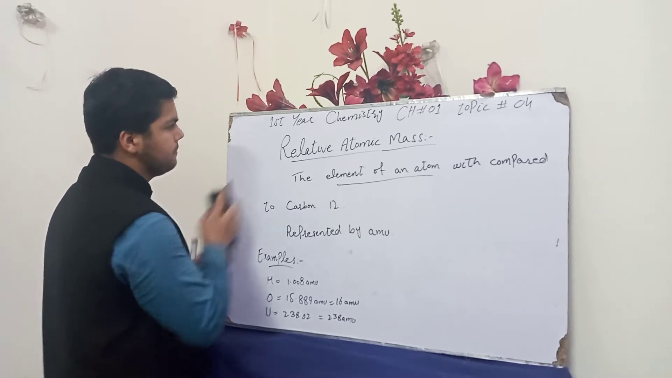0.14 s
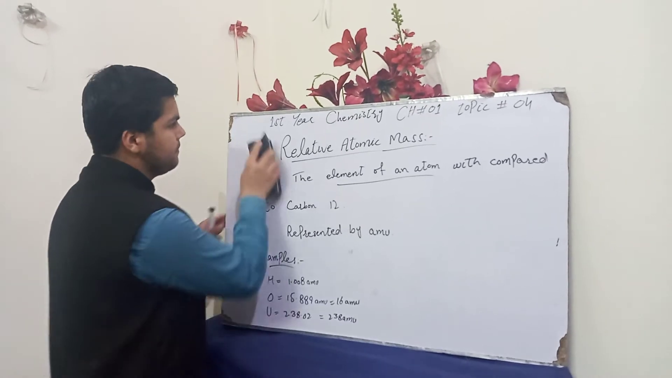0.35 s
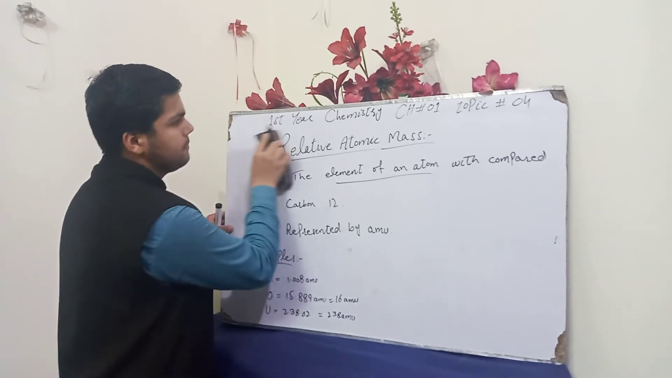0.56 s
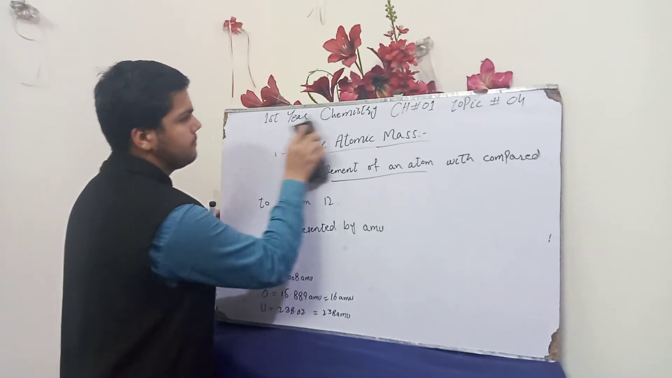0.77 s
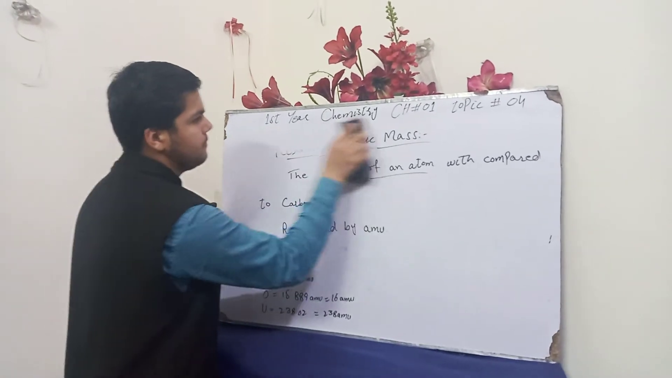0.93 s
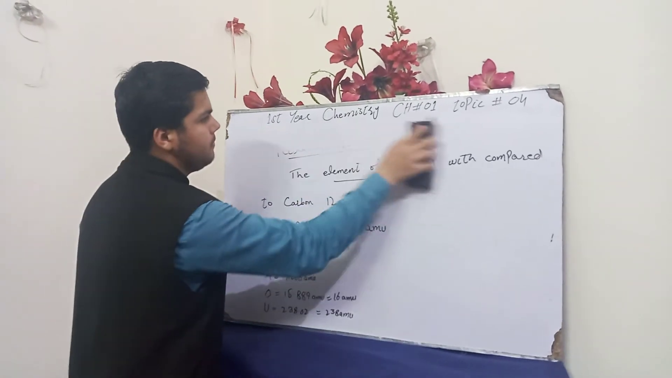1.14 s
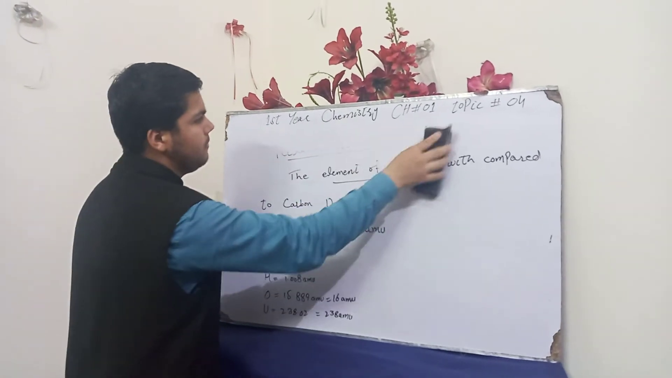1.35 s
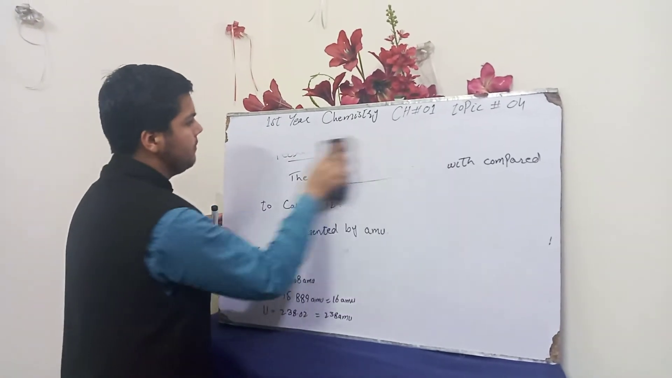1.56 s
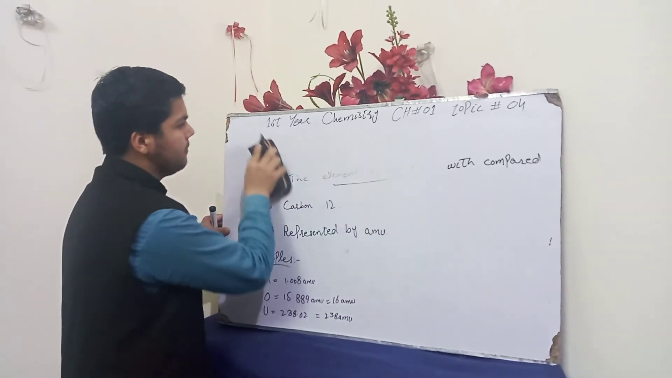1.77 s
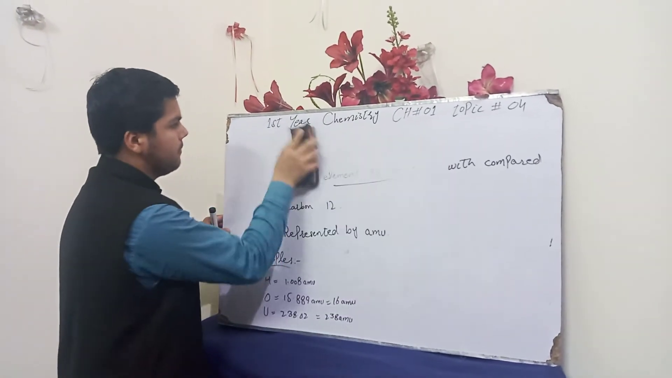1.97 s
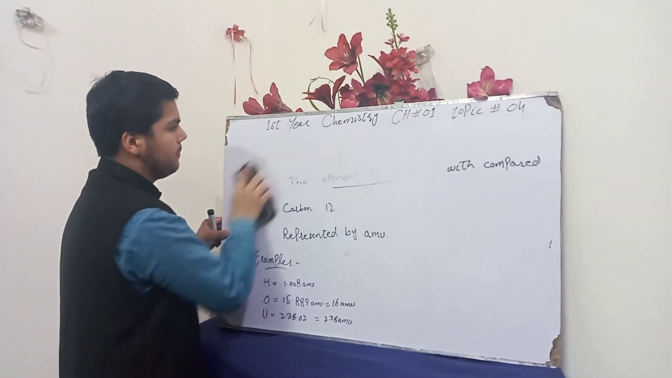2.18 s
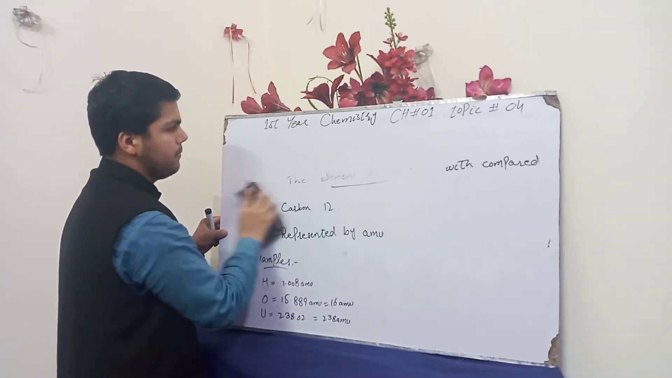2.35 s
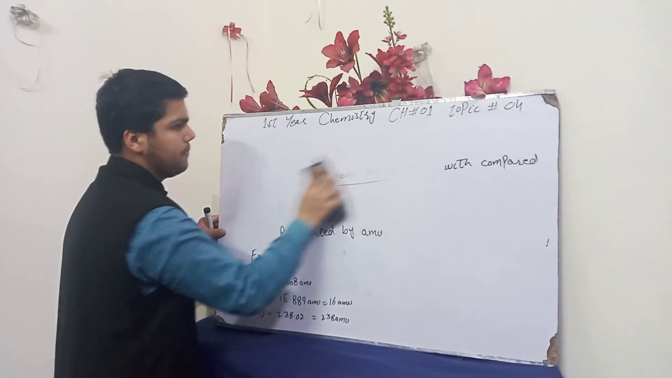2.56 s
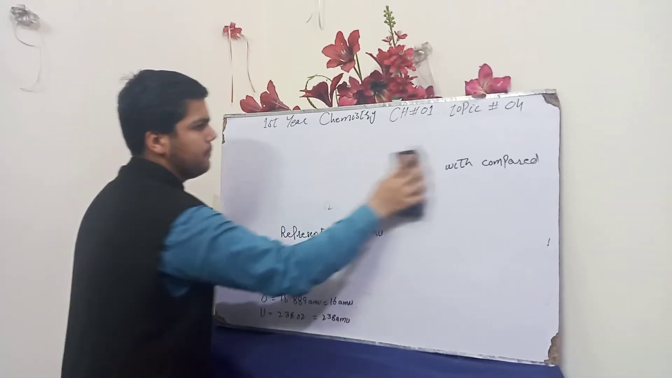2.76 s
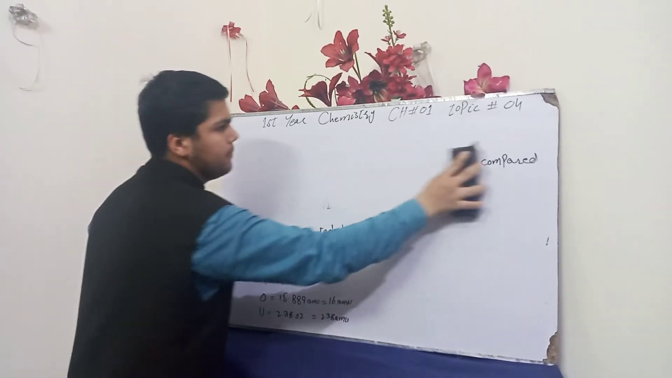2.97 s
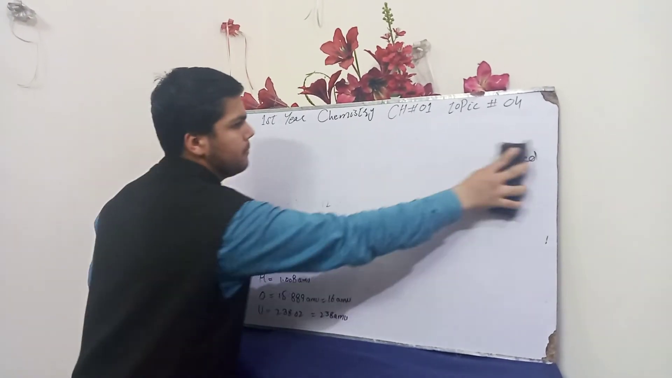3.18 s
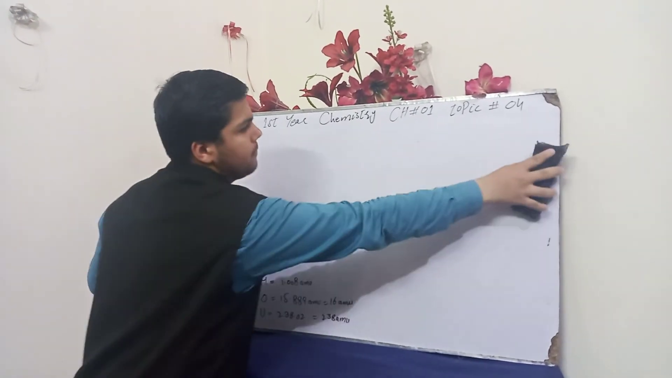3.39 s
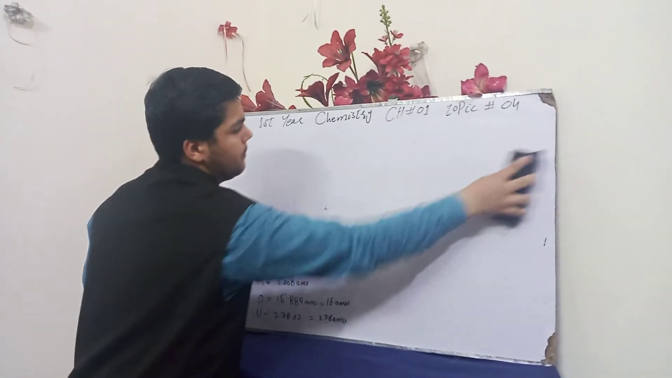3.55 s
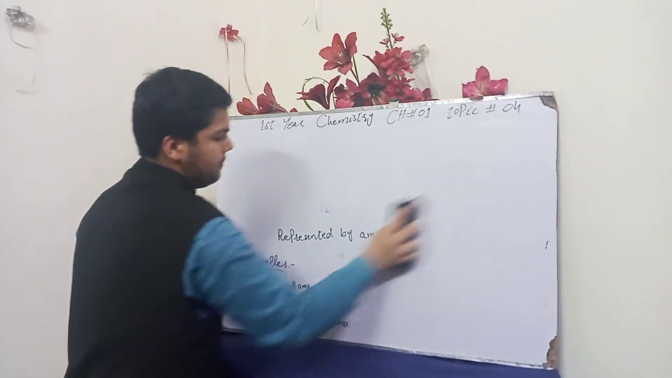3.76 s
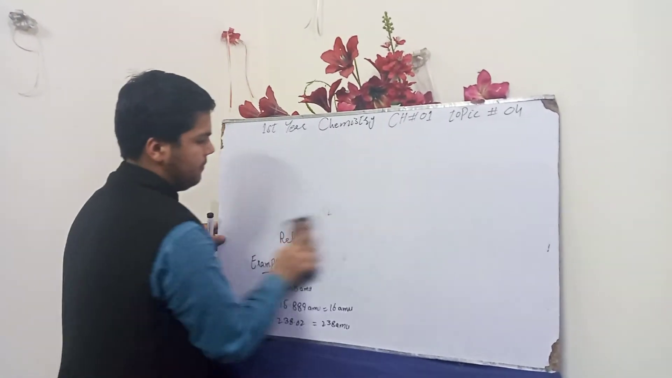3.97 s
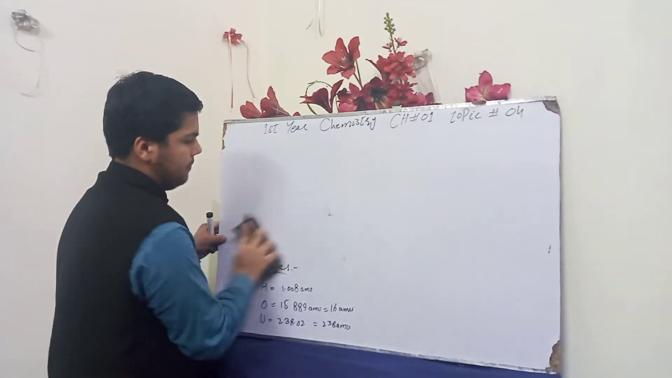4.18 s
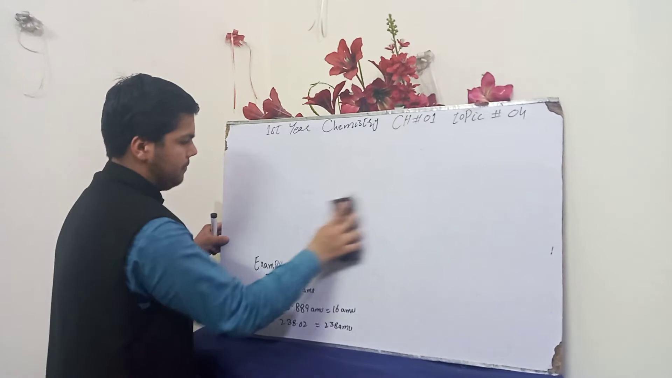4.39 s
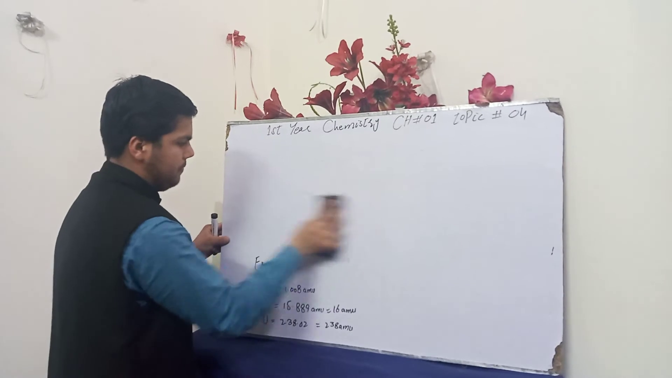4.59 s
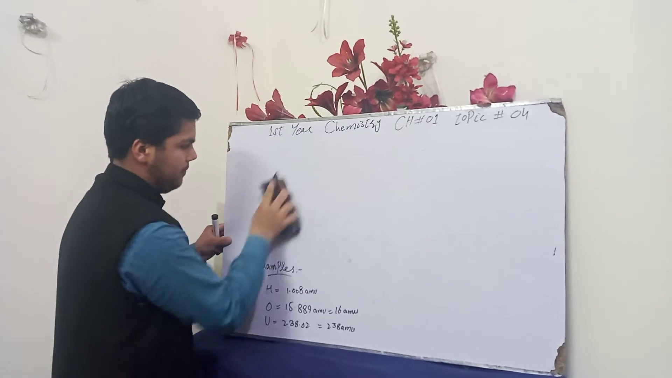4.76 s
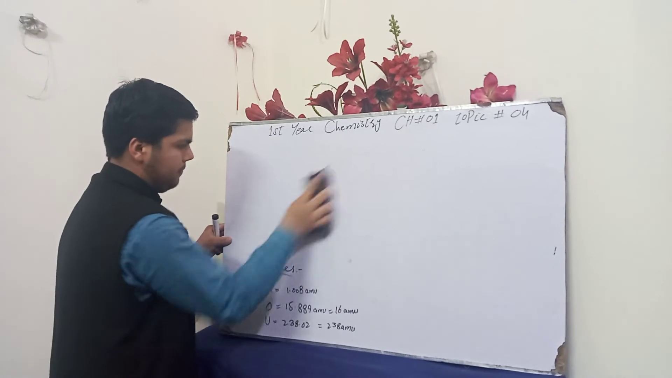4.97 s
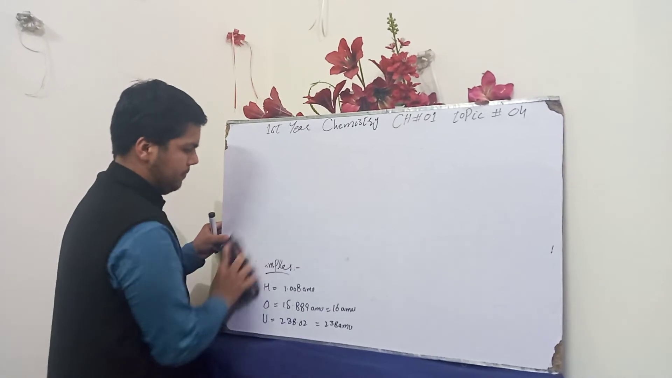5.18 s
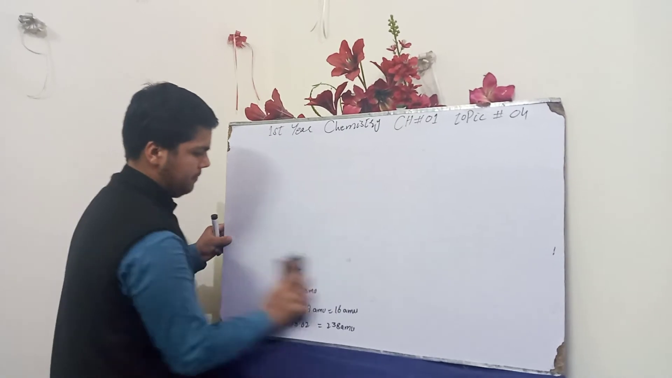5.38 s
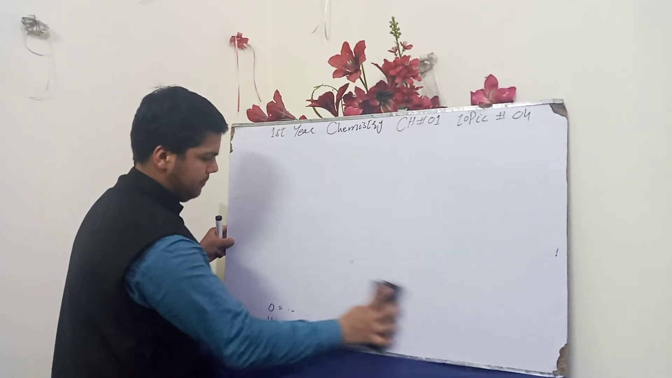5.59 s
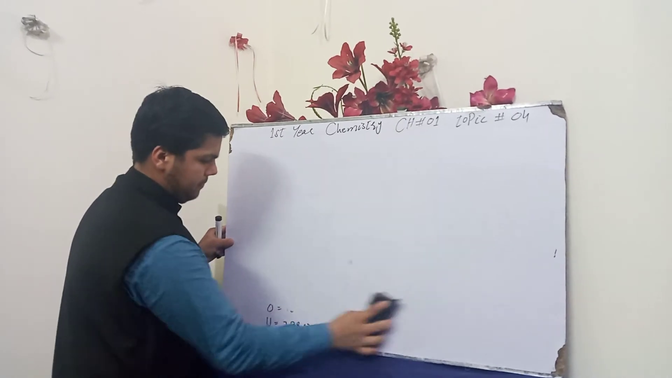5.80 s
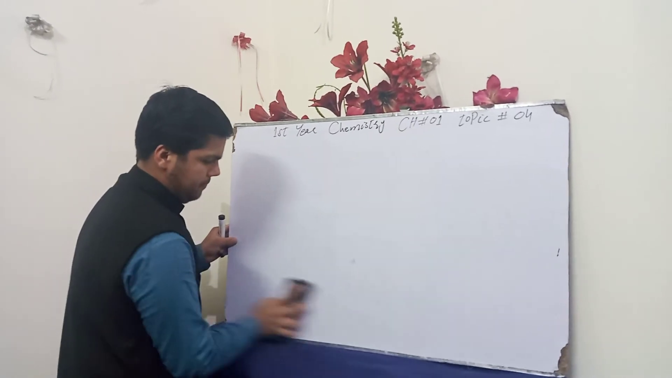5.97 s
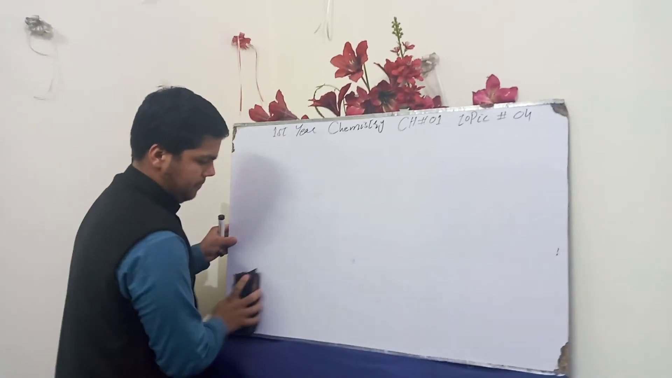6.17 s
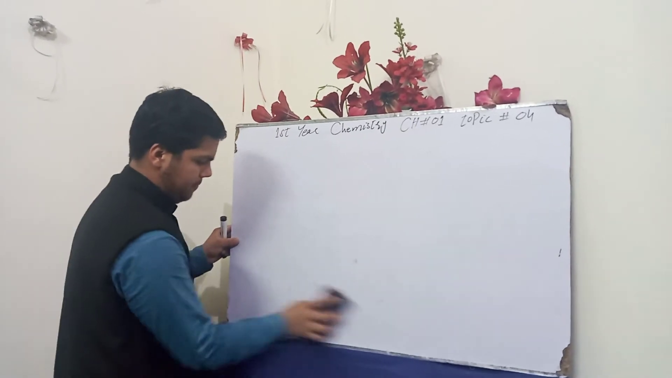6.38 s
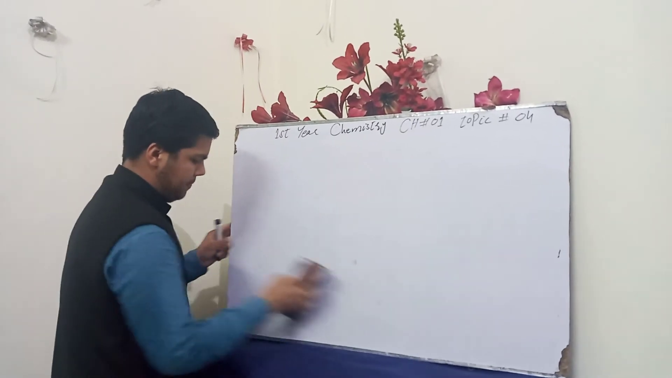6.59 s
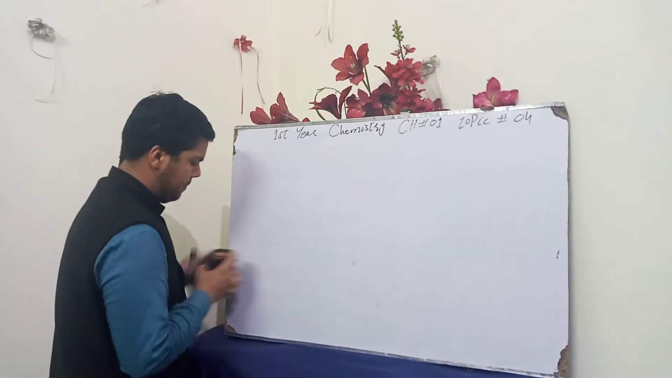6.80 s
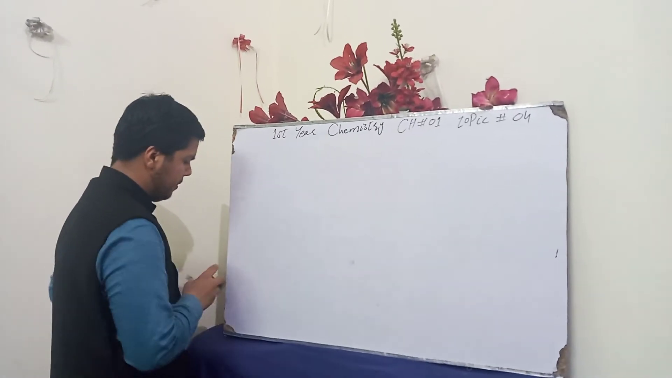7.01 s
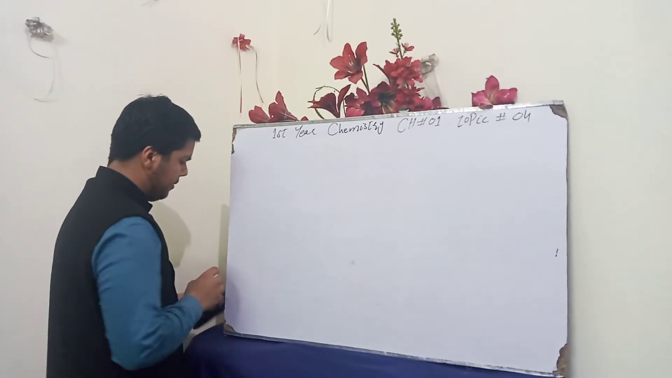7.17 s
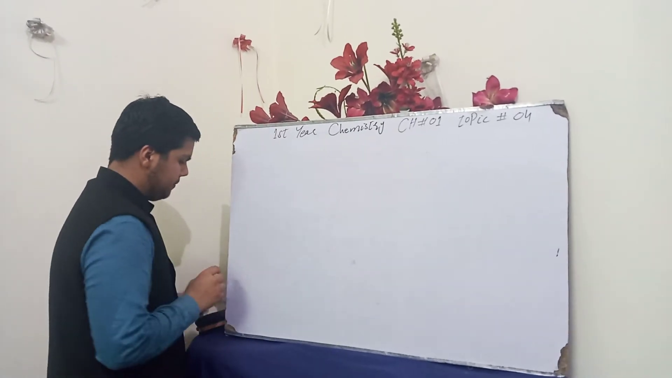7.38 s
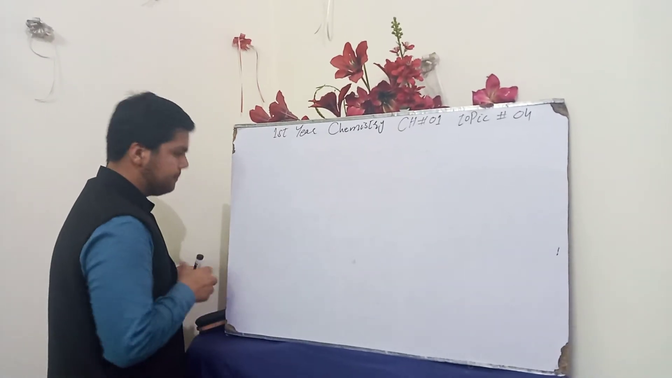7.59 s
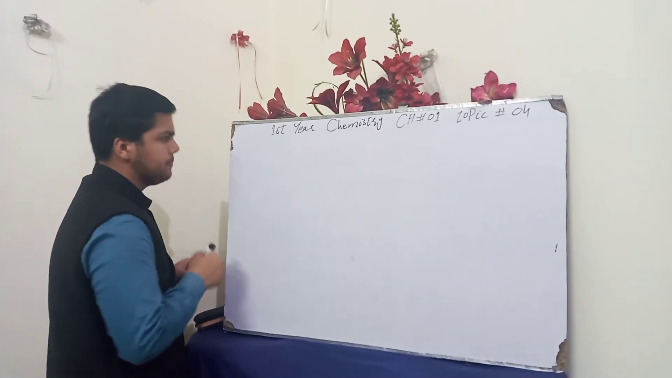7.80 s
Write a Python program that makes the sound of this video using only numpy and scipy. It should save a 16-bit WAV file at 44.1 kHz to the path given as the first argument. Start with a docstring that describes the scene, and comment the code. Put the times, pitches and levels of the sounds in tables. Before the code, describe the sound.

Steady rubbing of an eraser to and fro across a whiteboard, with small ticks, then rustling sleeves and a dull knock.

```python
"""A sleeve rustles in a small, quiet room, then a felt eraser wipes a whiteboard in long strokes to and fro.
The felt hisses with the hand's speed and rubs hollowly where it grips; the hard rim ticks at the turns.
The loose board flexes under the hand and knocks softly when the wiping is over, as the sleeves drop.
On a pair of microphones, the hiss reaches the left one about a millisecond late,
and that lag follows the eraser across the board."""
import sys
import numpy as np
from scipy import signal
from scipy.fft import rfft, irfft, next_fast_len
from scipy.io import wavfile
from scipy.ndimage import uniform_filter1d, map_coordinates

SR = 44100
rng = np.random.default_rng(int(sys.argv[2]) if len(sys.argv) > 2 else 0)


def inscribe(sig):
    """Save sig as 16-bit PCM at rate SR to the path in sys.argv[1].

    A 1-D sig is mono; a 2-D sig holds one channel per row.
    Samples are clipped to [-1, 1] before scaling.
    """
    pcm = np.round(np.clip(np.atleast_2d(sig).T, -1, 1) * 32767)
    wavfile.write(sys.argv[1], SR, pcm.astype(np.int16))


N = 345811

# sweeps of the arm, turn to turn: start_s, speed_up_s, slow_down_s, full_speed_db, first_edge_hz,
# last_edge_hz, first_tilt_db_per_octave, last_tilt_db_per_octave, direct_share
ARM_STROKES = [(0.196, 0.16, 0.076, -48, 1980.0, 1310.0, 0.5, -5.5, 0.44),
               (0.412, 0.68, 0.12, -34, 1780.0, 1750, -1.5, -3.8, 0.6),
               (1.221, 0.39, 0.17, -32.5, 1120, 840.0, -2.5, -1.5, 0.72),
               (1.728, 0.045, 0.2, -34.5, 570.0, 1620, -3.1, -2.4, 0.45),
               (1.931, 0.2, 0.081, -35.3, 1290.0, 1640.0, -2.0, -3, 0.57),
               (2.148, 0.45, 0.75, -31.5, 1670, 1740, -2.4, -7, 0.4),
               (3.378, 0.624, 0.061, -33, 1610, 1420.0, -1.2, -0.5, 0.63),
               (4.09, 0.22, 0.112, -32, 810.0, 2120, -1.8, -4.0, 0.58),
               (4.406, 0.18, 0.11, -33.5, 1130, 1590, -3, -1.2, 0.53),
               (4.671, 0.015, 0.23, -32.5, 1240, 1100, -3.5, -2.5, 0.5),
               (4.852, 0.255, 0.052, -34, 960.0, 1640.0, -1.7, -2.5, 0.55),
               (5.139, 0.31, 0.19, -29.8, 1040, 1650.0, 0.3, -8, 0.55),
               (5.576, 0.44, 0.072, -35, 1340, 1510, -3, -1.5, 0.4),
               (6.087, 0.16, 0.19, -36, 1360, 1300, 3, -6.5, 0.46),
               (6.326, 0.073, 0.26, -53, 1810, 3800, -1, -4, 0.25)]
# lag of the left microphone at first contact, then at the end of each stroke: lag_ms
TURN_LAGS_MS = [1.03, 1.02, .868, 1.03, .982, 1.042, .79, 1.04, .938, 1.022, .965, 1.05, .918, 1.04, .96,
                1.07]


def amp(db):
    """Decibels to gain."""
    return 10 ** (np.asarray(db) / 20)


def unit(x):
    """x at rms 1."""
    return x / np.sqrt(np.mean(x ** 2) + 1e-20)


def along(points, hz):
    """(Hz, value) points read on a log axis."""
    f, v = np.transpose(points)
    return np.interp(np.log(hz + 1), np.log(f), v)


def wobble(rate):
    """A smooth random curve, rate knots a second."""
    return map_coordinates(rng.standard_normal(int(N * rate / SR) + 4), [np.arange(N) * rate / SR])


def filtered(x, response):
    """x times a response of frequency."""
    size = next_fast_len(N + 8192)
    return irfft(rfft(x, size) * response(np.fft.rfftfreq(size, 1 / SR)), size)[..., :N]


def coloured(x, spectrum):
    """x shaped by a spectrum, at rms 1."""
    return unit(filtered(x, lambda hz: amp(along(spectrum, hz))))


def add(track, s, sound):
    """Mix a sound into a track at time s."""
    part = track[..., round(s * SR):][..., :sound.shape[-1]]
    part += sound[..., :part.shape[-1]]


def hand_speeds(t):
    """One row per stroke: the hand eases up to full speed (1) and down to rest again."""
    start, rise, fall = np.transpose(ARM_STROKES)[:3, :, None]
    ramp = np.minimum((t - start) / rise, (start + rise + fall - t) / fall)
    return np.sin(np.pi / 2 * np.clip(ramp, 0, 1))


def lag_ms(t):
    """The left microphone's lag follows the eraser's place on the board."""
    travelled = hand_speeds(t).cumsum(axis=1)
    return TURN_LAGS_MS[0] + np.diff(TURN_LAGS_MS) @ (travelled / travelled[:, -1:])


def mic_pair(x):
    """The direct sound at both microphones, the left one late."""
    n = np.arange(N)
    coarse = n[::64]
    late = n - np.interp(n, coarse, lag_ms(coarse / SR)) * SR / 1000
    return np.array([map_coordinates(x, [late], order=5), x])


def stereo_noise(direct):
    """White noise: a direct share common to both microphones, the rest scattered by the walls."""
    share = np.clip(direct, 0, 1)
    common = mic_pair(rng.standard_normal(N))
    return np.sqrt(share) * common + np.sqrt(1 - share) * rng.standard_normal((2, N))


def in_room(x, wet_db, t60):
    """The direct sound and the short answer of the walls."""
    t = np.arange(SR // 2) / SR
    tail = rng.standard_normal((2, len(t))) * amp(-60 * t / t60) * (t > .003)
    tail /= np.linalg.norm(tail[0])
    return mic_pair(x) + amp(wet_db) * signal.fftconvolve(x[None], tail, axes=1)[:, :N]


def patches(shape, depth_db, bins, frames):
    """Random gain over frequency and time: nearby reflections shift as the hand moves."""
    field = rng.standard_normal(shape)
    for _ in range(2):
        field = uniform_filter1d(uniform_filter1d(field, bins, axis=-2), frames, axis=-1)
    return amp(depth_db * unit(field))


def room_tone(rumble_db=-67, air_db=-69, swell_db=1.7):
    """A low rumble that wells up unevenly, and a thin hiss."""
    # the room's low end: frequency_hz, level_db
    rumble_spectrum = [(20, -15), (45, -20), (75, -6.5), (130, -2), (210, -6.5), (300, -11.5), (450, -15),
                       (700, -19), (1500, -34), (4000, -70)]
    # the room's hiss: frequency_hz, level_db
    air_spectrum = [(300, -2.5), (800, 0.5), (990, 8), (1150, 5), (5000, 1), (7200, 6), (8200, -4),
                    (9500, -1), (12000, -13), (13800, -16), (14700, -6), (15700, -7)]
    z = signal.stft(stereo_noise(direct=0.56), SR, nperseg=2048)[2]
    lumps = patches(z.shape[1:], depth_db=3.5, bins=2, frames=3)
    rumble = coloured(signal.istft(z * lumps, SR, nperseg=2048)[1][:, :N], rumble_spectrum)
    rumble *= amp(rumble_db + swell_db * wobble(rate=9))
    return rumble + amp(air_db) * coloured(stereo_noise(direct=0.092), air_spectrum)


def sleeves(gain_db=2, crinkle_db=2.3, crisp_hz=7800):
    """Cloth and hand brush along as the arm comes up and drops again; each brush swells and fades."""
    # brushes of the sleeve: peak_s, level_db, swell_s, t60_s, extra_treble_db
    sleeve_brushes = [(0, -58, .017, 2, 0), (.125, -55, .02, .4, 0), (6.465, -57, .017, .6, 0),
                      (6.5, -56, .02, 1, -2), (6.64, -55.5, .012, .4, 2), (6.67, -56, .01, .5, -1),
                      (6.755, -52.5, .015, .5, -1), (6.861, -44.5, .016, .22, 2),
                      (6.897, -49.5, .012, .25, -2), (6.97, -58.5, .05, 1.3, -4), (7.082, -64, .02, .6, -3),
                      (7.175, -65, .03, .6, 0), (7.242, -55, .02, .5, 3.5), (7.292, -57, .02, .25, 2),
                      (7.575, -68, .05, .4, 5), (7.688, -62.5, .018, .25, 2)]
    # rustling cloth: frequency_hz, level_db
    cloth_spectrum = [(200, -21), (700, -36), (1400, -12), (2800, -6), (3700, -2), (7000, 0.5),
                      (8200, -8.5), (9500, -8), (11000, -19.5), (13500, -25), (14700, -9), (15700, -29)]
    t = np.arange(N) / SR
    power = np.array([amp(db - 60 * np.maximum(t - s, 0) / t60) ** 2
                      * np.exp(-2 * (np.minimum(t - s, 0) / swell) ** 2)
                      for s, db, swell, t60, _ in sleeve_brushes])
    crispness = amp([row[-1] for row in sleeve_brushes]) ** 2
    z = signal.stft(stereo_noise(direct=0.25), SR, nperseg=512)[2]
    folds = patches(z.shape, depth_db=2.4, bins=2, frames=8)
    rustle = signal.istft(z * folds, SR, nperseg=512)[1][:, :N]
    cloth = coloured(rustle * amp(crinkle_db * wobble(rate=79)), cloth_spectrum)
    top = filtered(cloth, lambda hz: hz > crisp_hz)
    return amp(gain_db) * (np.sqrt(power.sum(0)) * (cloth - top) + np.sqrt(crispness @ power) * top)


def rubbing(t, speed_power=0.6, turn_dull_db=1, turn_diffuse=.2, linger_db=-4.8, linger_t60=0.5):
    """Hand speed and the felt's bites set the hiss's level, low edge, treble tilt and direct share."""
    # the felt bites as the hand bears down, mostly just after a turn:
    # time_s, louder_db, half_length_s, edge_drop_octaves, brighter_db_per_octave
    felt_bites = [(1.311, 2.5, 0.027, 0.0, 0), (1.785, 4.5, 0.015, 0.28, 0.5),
                  (1.975, 5.5, 0.028, 0.21, 0.4), (2.276, 1.3, 0.056, 0.96, 2.5),
                  (3.232, 3.5, 0.14, 0.0, 3.5), (3.574, 0.3, 0.069, 0.38, -0.5),
                  (4.114, 10.5, 0.042, 0.069, 0.5), (4.457, 7, 0.02, 0.012, 4.5),
                  (4.704, 3.5, 0.022, 0.1, -0.2), (4.909, 5.5, 0.03, 0.08, 1.5),
                  (5.44, 2, 0.067, 0.0019, -0.2), (5.915, 2, 0.038, 0.6, 0.5)]
    strokes = np.transpose(ARM_STROKES)[:, :, None]
    start, rise, fall, full_db, first_hz, last_hz, first_tilt, last_tilt, direct = strokes
    speed = hand_speeds(t)
    progress = np.clip((t - start) / (rise + fall), 0, 1)
    power = (amp(full_db) * speed ** speed_power) ** 2 + 1e-14
    # the hiss lingers in the room and fills the turns
    kept = amp(-60 * (t[1] - t[0]) / linger_t60) ** 2
    power = power + amp(linger_db) ** 2 * signal.lfilter([1 - kept], [1, -kept], power)
    share = power / power.sum(0)  # strokes overlap where a turn is rounded
    edge_hz = (share * (first_hz + (last_hz - first_hz) * progress)).sum(0)
    # a slowing hand loses treble and direct sound, leaving the room
    stroke_tilt = first_tilt + (last_tilt - first_tilt) * progress - turn_dull_db * (1 - speed) ** 2
    tilt = (share * stroke_tilt).sum(0)
    direct = (share * direct * speed ** turn_diffuse).sum(0)
    s, louder_db, length, octaves, brighter = np.transpose(felt_bites)
    bite = np.exp(-((t - s[:, None]) / length[:, None]) ** 2)
    level_db = 10 * np.log10(power.sum(0)) + louder_db @ bite
    return level_db, edge_hz / 2 ** (octaves @ bite), tilt + brighter @ bite, direct


def swish(hz, t, depth_db=1.9, count=10, echo_ms=(0.497, 6), slide_spread=1.83):
    """Each nearby reflection combs the hiss, and the combs sweep as the eraser travels."""
    moved_ms = lag_ms(t) - TURN_LAGS_MS[0]
    delays = rng.uniform(*echo_ms, (count, 2, 1, 1))
    slides = rng.normal(0, slide_spread, (count, 2, 1, 1))
    combs = sum(np.cos(2 * np.pi * hz * (ms + slide * moved_ms) / 1000)
                for ms, slide in zip(delays, slides))
    return amp(depth_db * unit(combs))


def eraser_hiss(grain_db=1.0, judder_db=0.58, knee_hz=4000, steepness=5.1, hump_db=3, hump_octaves=0.077):
    """Countless felt fibres slip at once; speed brightens them, pressure lets the board sound lower."""
    # the felt's hiss as heard, with the microphones' bright peaks near 6.6 and 15 kHz:
    # frequency_hz, level_db
    hiss_spectrum = [(100.0, -30.0), (600.0, -25.5), (920.0, -16.5), (1300.0, -14.5), (2100.0, -9),
                     (2500.0, -8), (3300.0, -6.5), (5000.0, -6.6), (6600.0, -1), (8100.0, -11),
                     (9500.0, -11.5), (13850.0, -21), (14650.0, -11.5), (15700.0, -7.5)]
    # the board's rings under the felt and the hollows between: centre_hz, width_hz, gain_db
    board_rings = [(848, 78, 7.5), (930, 26, 7), (1002.3, 37, 13), (1664, 40, 2), (2084, 300, 2.2),
                   (2750, 390, -1), (3290, 260, 2.5), (3750, 260, 0.15), (4190, 350, 2)]
    coarse = np.arange(0, N, 64)
    level_db, _, _, direct = [np.interp(np.arange(N), coarse, curve) for curve in rubbing(coarse / SR)]
    hz, t, z = signal.stft(unit(stereo_noise(direct)), SR, nperseg=1024)
    hz = hz[:, None] + 1
    _, edge_hz, tilt_db, _ = rubbing(t)
    colour = unit(amp(along(hiss_spectrum, hz)))
    board = amp(sum(db / (1 + (2 * (hz - centre) / width) ** 2) for centre, width, db in board_rings))
    # the pad radiates only above a steep, resonant edge, which drops as it bears down
    hump = amp(hump_db * np.exp(-(np.log2(hz / edge_hz) / hump_octaves) ** 2))
    contact = hump / np.sqrt(1 + (edge_hz / hz) ** (2 * steepness))
    treble = amp(tilt_db * np.log2(np.maximum(hz / knee_hz, 1)))
    reflections = patches(z.shape, depth_db=1.15, bins=3, frames=13) * swish(hz, t)
    hiss = signal.istft(z * colour * board * contact * treble * reflections, SR, nperseg=1024)[1][:, :N]
    grip = unit(amp(grain_db * wobble(rate=900) + judder_db * wobble(rate=42)))
    return hiss * grip * amp(level_db)


def board_flexes(fade_s=.016):
    """The board gives soft low thuds that swell for a few cycles and stop short."""
    # soft thuds as the board gives: peak_s, level_db, pitch_hz, swell_s
    heaves = [(.382, -48.5, 94, .016), (.734, -55, 132, .02), (1.756, -45, 146, .03),
              (3.186, -60, 135, .02), (3.979, -58, 123, .02), (4.43, -55, 128, .015),
              (7.165, -50.5, 135, .02), (7.23, -49, 70, .014), (7.543, -56, 119, .025),
              (7.712, -55, 137, .025)]
    track, t = np.zeros(N), np.arange(SR // 5) / SR - .1
    for s, db, hz, swell_s in heaves:
        heave = np.exp(-(t / np.where(t < 0, swell_s, fade_s)) ** 2)
        add(track, s + t[0], amp(db) * heave * np.sin(2 * np.pi * (hz * t + rng.random())))
    return mic_pair(track)


def eraser_drags(half_width_hz=110):
    """Eraser and board resonate briefly while the felt grips."""
    # the eraser lands, presses, turns or lifts: peak_s, level_db, half_length_s, resonance_hz
    hollow_rubs = [(0.421, -70.5, 0.12, 1023), (1.812, -66, 0.045, 487), (2.283, -66, 0.031, 500),
                   (2.375, -63, .03, 1010), (2.44, -50.5, 0.079, 2080), (2.62, -66, .1, 1050),
                   (3.08, -50, 0.13, 1840), (3.581, -62, 0.07, 1000), (4.156, -60.5, 0.05, 490),
                   (2.6, -47, 0.078, 3380), (4.3, -45.5, 0.068, 3330), (4.62, -51, 0.034, 2050),
                   (4.727, -66, 0.055, 487), (4.903, -77, 0.068, 476), (5.1, -51, 0.033, 1970),
                   (5.39, -48, 0.054, 3190), (5.43, -44.5, 0.065, 4260), (5.49, -45.5, 0.046, 2000),
                   (5.7, -69, 0.028, 1070), (5.931, -67, 0.057, 505), (6.22, -62.5, 0.046, 1100),
                   (6.778, -66, 0.044, 504), (6.892, -67, 0.025, 1850), (6.998, -68, 0.037, 1490)]
    track, t = np.zeros(N), np.arange(SR // 2) / SR - .25
    hz = np.fft.rfftfreq(len(t), 1 / SR)
    for s, db, length, body_hz in hollow_rubs:
        band = 1 / (1 + ((hz - body_hz) / half_width_hz) ** 4)
        body = unit(irfft(rfft(rng.standard_normal(len(t))) * band, len(t)))
        add(track, s + t[0], amp(db) * np.exp(-(t / length) ** 2) * body)
    return in_room(track, wet_db=-2.0, t60=0.12)


def dry_ticks(t60=.003):
    """The eraser's hard rim catches on the board with dry little cracks; later, it scuffs at the board's edge
    with a few ticks, and the eraser is set down with a click."""
    # dry little cracks: start_s, peak_db, low_hz, high_hz; the rim catches up to 6.2 s, then the eraser scuffs
    # at the board's edge, and it is set down at 7.23 s
    dry_cracks = [(1.3012, -17, 2000, 7000), (1.3074, -25, 2000, 8000), (1.3184, -22, 2000, 7000),
                  (4.1074, -22, 2000, 8000), (4.1204, -21, 2000, 8000), (4.1334, -20, 2000, 7000),
                  (4.2075, -24, 2000, 7000), (4.6778, -21, 2000, 8000), (4.6974, -18, 2000, 8000),
                  (5.2151, -24, 2000, 8000), (5.2595, -17, 2000, 7500), (6.137, -23, 3500, 9000),
                  (6.6344, -43, 4000, 10000), (6.6653, -42, 4000, 10000), (6.7361, -35.5, 3000, 9000),
                  (6.8578, -35, 4000, 11000), (7.2325, -33, 4000, 16000), (7.674, -55, 5000, 13000)]
    track, t = np.zeros(N), np.arange(SR // 20) / SR
    for s, db, low_hz, high_hz in dry_cracks:
        band = signal.butter(2, [low_hz, high_hz], 'band', fs=SR, output='sos')
        crack = signal.sosfilt(band, rng.standard_normal(len(t)) * amp(-60 * t / t60))
        add(track, s, amp(db) * crack / abs(crack).max())
    return in_room(track, wet_db=-5, t60=.15)


def board_knocks(rise_cycles=3.6, scatter_db=.8, thud_db=-10, thud_t60=.3, choke_db=9, choke_s=0.025):
    """Each blow rings the panel; a softer contact swells more slowly and reaches only its lowest modes."""
    # the board knocks and settles: start_s, peak_db, contact_cutoff_hz, free_ring_s
    board_blows = [(7.229, -27, 500, .15), (7.27, -40, 550, .11), (7.32, -39, 180, .062)]
    # the panel's modes: pitch_hz, level_db, t60_s
    panel_modes = [(72, -12, .2), (107, -6, .3), (122, -12, .2), (143, -11, .2), (163, -5, .34),
                   (201, -2, .17), (223, 0, .17), (248, 3, .1), (267, 1, .27), (311, -11, .25),
                   (351, -3.5, .24), (417, -3.5, .25), (481, -15, .25), (533, -17, .22), (597, -19, .2),
                   (738, -24, .2), (853, -19, .22), (891, -21, .25)]
    # the crowd of higher modes, heard as a dull thud: frequency_hz, level_db
    thud_spectrum = [(40, -32), (100, -5), (260, 0), (420, -5), (560, -10), (700, -14), (900, -13.5),
                     (1300, -24), (3000, -50)]
    track, t = np.zeros(N), np.arange(SR // 2) / SR
    hz, mode_db, t60 = np.transpose(panel_modes)[:, :, None]
    thud_shape = amp(along(thud_spectrum, np.fft.rfftfreq(len(t), 1 / SR)))
    for s, db, cutoff_hz, free_s in board_blows:
        strength = amp(mode_db + scatter_db * rng.standard_normal(hz.shape))
        phase = rng.normal(0, .5, hz.shape)
        modes = strength * amp(-60 * t / t60) * np.sin(2 * np.pi * hz * t + phase)
        ring = modes.sum(0) / np.linalg.norm(strength)
        crowd = unit(irfft(rfft(rng.standard_normal(len(t))) * thud_shape, len(t)))
        onset = 1 - np.exp(-(t * cutoff_hz / rise_cycles) ** 2)
        blow = (ring + amp(thud_db - 60 * t / thud_t60) * crowd) * onset
        blow = signal.sosfilt(signal.butter(3, cutoff_hz, fs=SR, output='sos'), blow)
        choke = amp(-choke_db * np.clip((t - free_s) / choke_s, 0, 1))  # the ring drops away quickly
        add(track, s, amp(db) * choke * blow / abs(blow).max())
    return mic_pair(track)


def scene():
    """Everything that reaches the two microphones."""
    wiping = eraser_hiss() + eraser_drags() + dry_ticks()
    return wiping + board_knocks() + board_flexes() + sleeves() + room_tone()


def record(dry, top_hz=15770):
    """The left microphone is the more sensitive below 8 kHz; nothing passes above the band limit."""
    # balance of the pair: frequency_hz, left_over_right_db
    mic_balance = [(60, 2), (450, 6), (740, 1), (1220, 5.5), (2010, 6.5), (3330, 6), (5500, 4.5),
                   (7200, 7.5), (8500, -1), (9500, -3.5), (12000, -1), (15000, -1.5)]

    def response(hz):
        ratio = amp(along(mic_balance, hz))
        return np.array([ratio, np.ones_like(hz)]) * np.sqrt(2 / (1 + ratio ** 2)) * (hz < top_hz)
    return filtered(dry, response)


dry = scene()
out = record(dry)
inscribe(out)
```